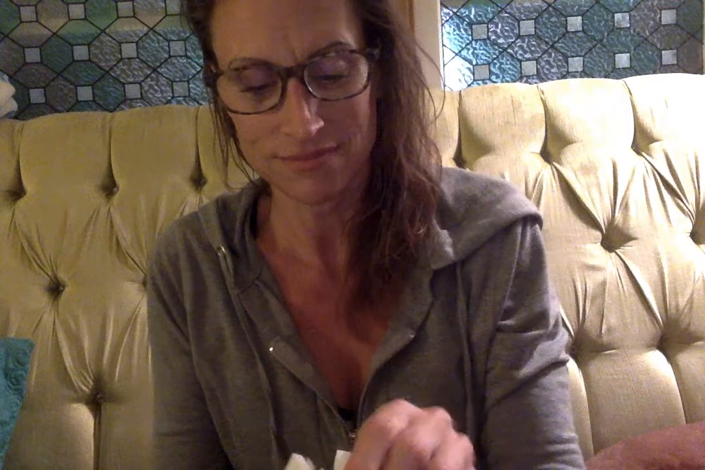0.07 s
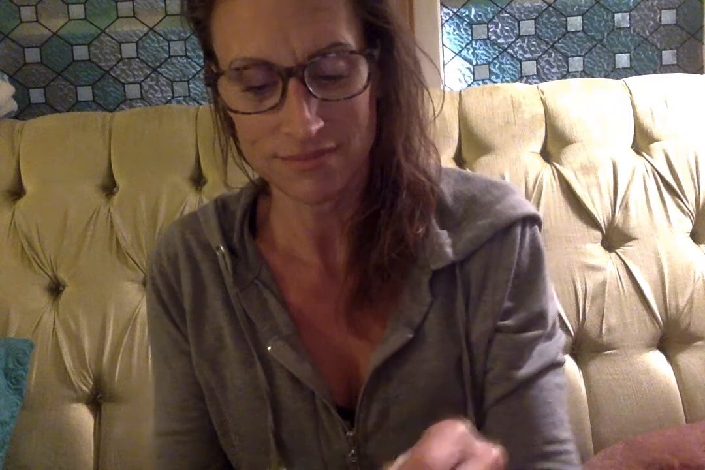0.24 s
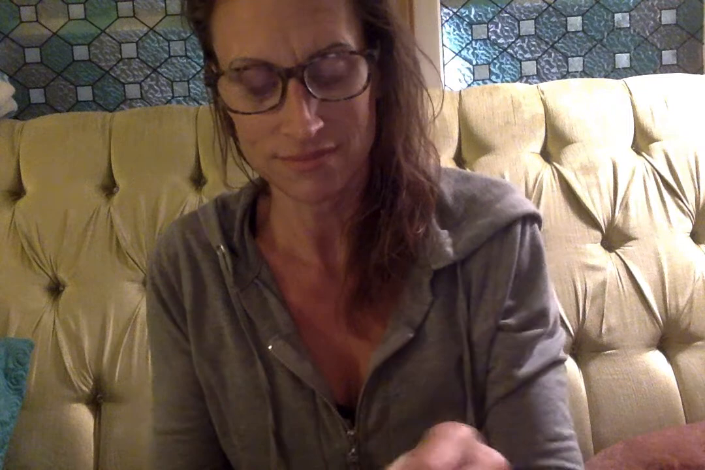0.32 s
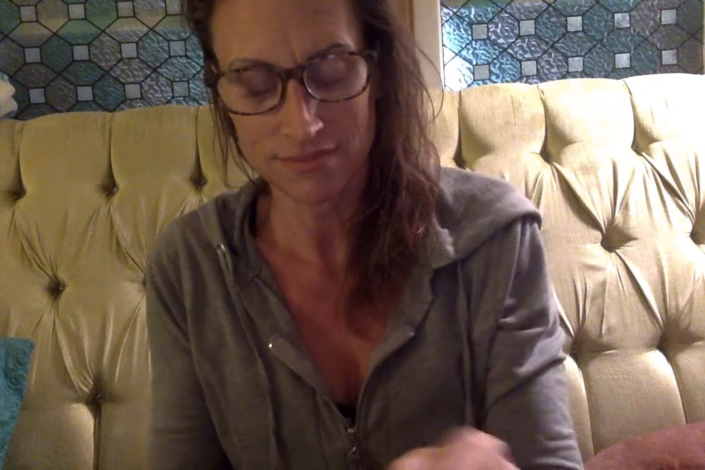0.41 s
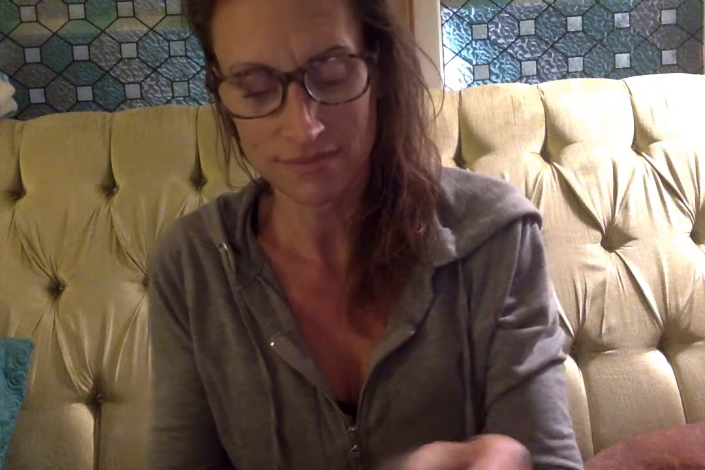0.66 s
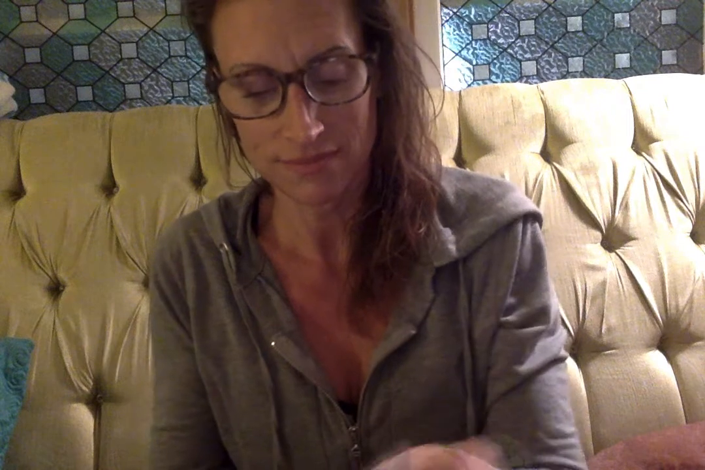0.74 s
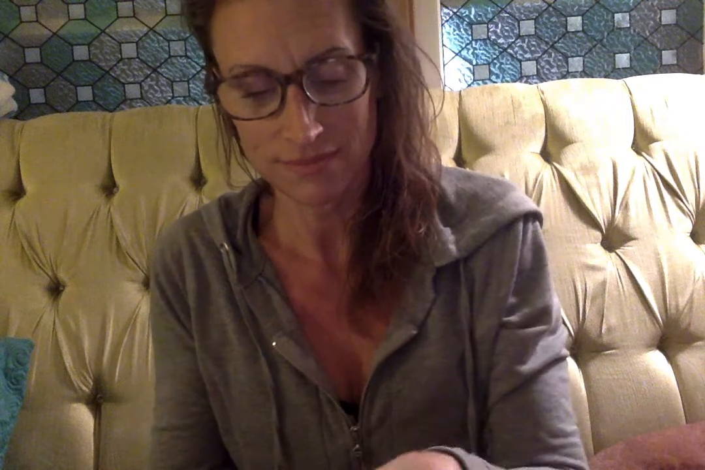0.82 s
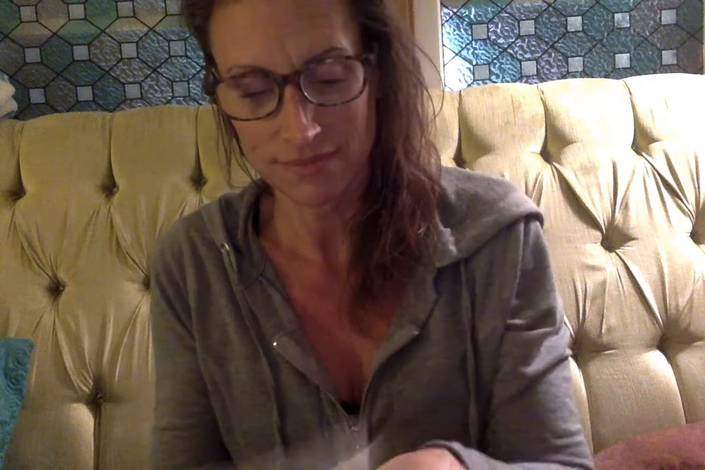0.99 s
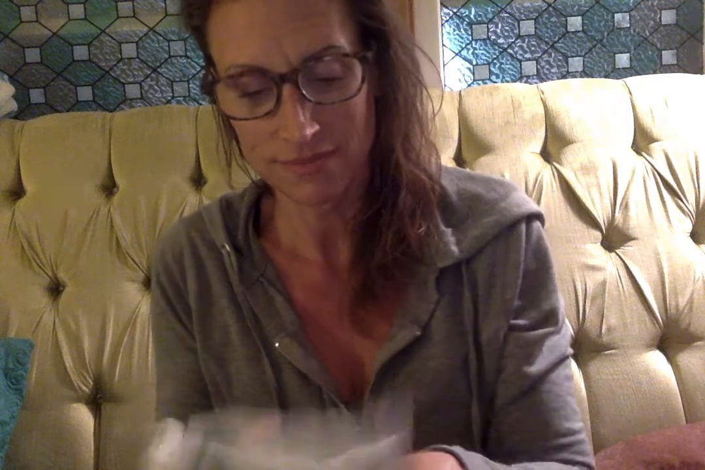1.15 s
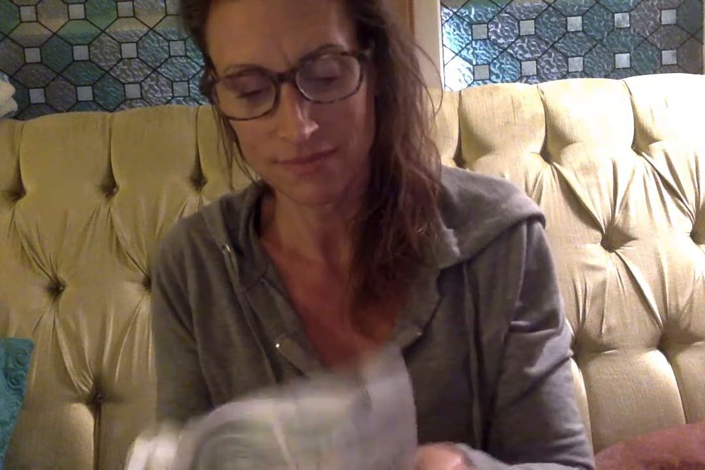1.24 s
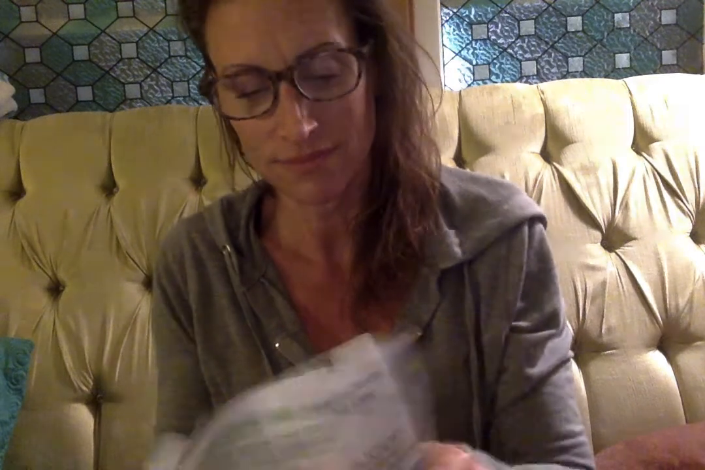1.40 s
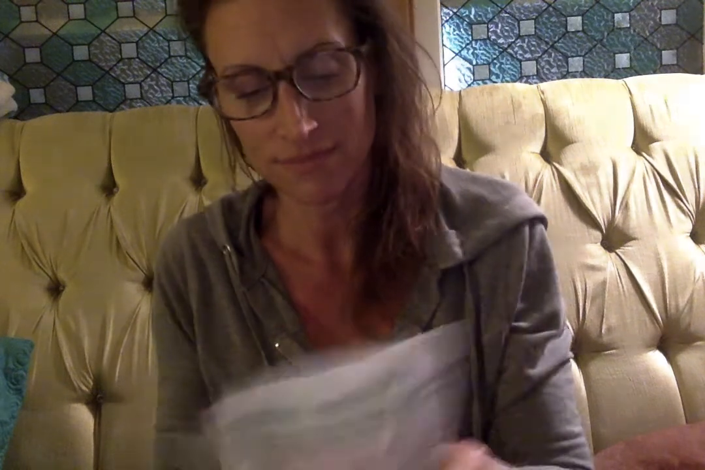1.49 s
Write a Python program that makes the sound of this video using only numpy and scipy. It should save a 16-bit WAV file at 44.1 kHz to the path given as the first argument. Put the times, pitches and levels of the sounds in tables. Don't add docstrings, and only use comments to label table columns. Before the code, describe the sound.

Paper being unfolded, close and dry. Near quiet at first, with faint room hiss and low fan hum. At 0.22 seconds a loud, bright burst of crease snaps, rubbing and dull knocks breaks out, thinning to stray ticks by 0.42. A quiet gap follows, then a small grip crackle and crisp snap around 0.73-0.79. From 1.15 to 1.45 the sheet slides open with softer crinkling and scattered snaps, then quiet.

```python
import sys
import numpy as np
from scipy import signal
from scipy.fft import rfft, irfft
from scipy.io import wavfile

SR = 44100
rng = np.random.default_rng(int(sys.argv[2]) if len(sys.argv) > 2 else 0)


def inscribe(sig):
    pcm = np.round(np.clip(np.atleast_2d(sig).T, -1, 1) * 32767)
    wavfile.write(sys.argv[1], SR, pcm.astype(np.int16))


def voltage_ratio(decibels):
    exponent = np.asarray(decibels, float) / 20
    return 10 ** exponent


N = 68355
BODY_LOW_HZ, BODY_HIGH_HZ, EDGE_TOP_HZ = 1600, 6740, 16000


def rms_one(x):
    return x / np.sqrt(np.mean(x ** 2) + 1e-20)


def band(x, low_hz, high_hz):
    sos = signal.butter(2, [low_hz, min(high_hz, 0.45 * SR)], "band", fs=SR, output="sos")
    return signal.sosfilt(sos, x)


def steep(x, low_hz, high_hz):
    return band(band(x, low_hz, high_hz), low_hz, high_hz)


def resonate(x, hz, width_hz):
    r = np.exp(-np.pi * width_hz / SR)
    zeros = np.array([1, 0, -1]) * (1 - r * r) / 2
    poles = [1, -2 * r * np.cos(2 * np.pi * hz / SR), r * r]
    return signal.lfilter(zeros, poles, x + 1e-18)


def colour(x, points):
    hz, db = np.transpose(points)
    size = 4096
    grid_hz = np.maximum(np.arange(size // 2 + 1) * SR / size, 1)
    log_gain = np.interp(np.log(grid_hz), np.log(hz), db) * np.log(10) / 20
    cepstrum = irfft(log_gain)
    cepstrum[1:size // 2] *= 2
    cepstrum[size // 2 + 1:] = 0
    impulse = irfft(np.exp(rfft(cepstrum)))
    return signal.fftconvolve(x, impulse)[:len(x)]


def drift(rate_hz):
    r = np.exp(-2 * np.pi * rate_hz / SR)
    return rms_one(signal.lfilter([1], [1, -2 * r, r * r], rng.standard_normal(N + SR))[SR:])


def add(out, start_s, burst, peak_db):
    i = int(start_s * SR)
    out[i:i + len(burst)] += voltage_ratio(peak_db) * burst / np.abs(burst).max()


# pitch_hz [Hz], density_db [dB per Hz]
HISS_SPECTRUM = [(130, -2.5), (500, -4.5), (850, -3.5), (1400, -9.5), (2500, -9.5), (6000, -21.5),
                 (14500, -41), (16500, -42)]
# pitch_hz [Hz], width_hz [Hz], level_db [dB]
FAN_TONES = [(107.3, 7.4, -71), (119.4, 11, -76.5), (193.4, 4.7, -82.5), (234.6, 3.5, -81.5),
             (328.3, 26, -79)]


def background():
    low_end = [(30, -42.5), (75, -10.0)]
    hiss = colour(rng.standard_normal(N + SR), low_end + list(HISS_SPECTRUM))[SR:]
    out = voltage_ratio(-68) * rms_one(hiss)
    for pitch_hz, width_hz, level_db in FAN_TONES:
        tone = resonate(rng.standard_normal(N + SR), pitch_hz, width_hz)
        tone = resonate(tone, pitch_hz, 2 * width_hz)
        out += voltage_ratio(level_db) * rms_one(tone[SR:])
    return out


# centre_hz [Hz], t60_s [s], level_db [dB]
ROOM_DECAY = [(500, 0.24, 3.5), (1600, 0.23, 3), (2900, 0.13, -6), (4300, 0.36, -5.5), (6300, .3, -4.5),
              (9000, 0.45, -11), (14000, 0.19, -0.1)]


def room(x):
    desk_ms, desk_db = 1.2, -16.5
    tail_db, tail_rise_s = -12.5, 0.0014
    t = np.arange(SR // 2) / SR
    centres_hz = np.array(ROOM_DECAY)[:, 0]
    edges_hz = np.r_[120, np.sqrt(centres_hz[1:] * centres_hz[:-1]), EDGE_TOP_HZ]
    tail = np.zeros(len(t))
    for (_, t60_s, level_db), low_hz, high_hz in zip(ROOM_DECAY, edges_hz, edges_hz[1:]):
        tail += voltage_ratio(level_db - 60 * t / t60_s) * band(rng.standard_normal(len(t)), low_hz, high_hz)
    tail *= 1 - np.exp(-t / tail_rise_s)
    tail /= np.sqrt(np.sum(tail ** 2))
    echo = np.interp(np.arange(N) - desk_ms * SR / 1000, np.arange(N), x)
    return x + voltage_ratio(desk_db) * echo + voltage_ratio(tail_db) * signal.fftconvolve(x, tail)[:N]


# start_s [s], peak_db [dB], pitch_hz [Hz]
KNOCK_EVENTS = [(.0085, -36, 790), (.009, -51, 1500), (0.221, -41, 280), (0.22, -25, 930), (.235, -21, 966),
                (0.241, -47.5, 99), (0.245, -29.5, 400), (0.258, -26.5, 960), (0.303, -37.5, 322),
                (.31, -44, 475), (.326, -32.5, 940), (.357, -31, 1330), (.42, -47, 1310), (1.205, -55, 338),
                (1.304, -30, 1600), (1.3856, -29.5, 1450), (.0088, -49.5, 500), (.7275, -31.5, 2280),
                (1.4288, -37.5, 4300), (1.024, -63.5, 830)]


def knocks():
    ring_cycles, gain_db = 8.0, 0.3
    out, t = np.zeros(N + SR), np.arange(4096) / SR
    for start_s, peak_db, pitch_hz in KNOCK_EVENTS:
        decay = voltage_ratio(-60 * t * (pitch_hz + 150) / ring_cycles)
        puff = rng.standard_normal(len(t)) * decay
        knock = resonate(resonate(puff, pitch_hz, pitch_hz), pitch_hz, pitch_hz)
        add(out, start_s, knock, peak_db + gain_db)
    return out[:N]


# start_s [s], end_s [s], pitch_hz [Hz], width_hz [Hz], level_db [dB]
SKIM_EVENTS = [
    (0.72, .787, 15200, 1400, -65.5),
    (1.358, 1.43, 20000, 1600, -74.5),
    (.74, .768, 4550, 2800, -56),
    (1.155, 1.4, 4000, 1000, -61.5),
    (1.185, 1.26, 2320, 670, -61),
    (.235, .3, 2950, 510, -38),
    (0.24, .42, 3300, 1050, -55),
    (1.216, 1.2, 10500, 3000, -64),
]


def skims():
    t = np.arange(N) / SR
    out = np.zeros(N)
    for start_s, end_s, pitch_hz, width_hz, level_db in SKIM_EVENTS:
        gate = np.interp(t, [start_s, start_s + 0.0034, end_s - 0.005, end_s], [0, 1, 1, 0])
        rub = steep(rng.standard_normal(N), pitch_hz - width_hz / 2, pitch_hz + width_hz / 2)
        out += voltage_ratio(level_db + 1.0 * drift(90.0)) * gate * rms_one(rub)
    return out


# time_s [s], level_db [dB], bright_db [dB]
SLIDE_EFFORT = [(0, -79, -16), (0.217, -67, -21), (0.227, -34.5, -2), (.3, -40, -4), (.4, -54.5, -31),
                (.5, -76.5, -15), (0.721, -79, -12), (.735, -71.5, -21), (0.777, -57, -21), (.83, -71, -1),
                (1.145, -89.5, -9), (1.159, -67.5, -10), (1.215, -53, -17.5), (1.27, -49, -29),
                (1.37, -57, -29), (1.421, -53.5, -8), (1.47, -61, -29), (1.55, -96.5, -0.5)]


def crinkle():
    grains_per_s, spread_db, ring_cycles = 14000, 2.5, 14.0
    low_hz, high_hz, tilt_db_per_octave, clump_db = 1766, 15000, -2, 3
    panel_hz, panel_width_hz, panel_db = 2900, 410, -4.5
    sizes = voltage_ratio(spread_db * np.minimum(rng.exponential(1, N), 4)) * rng.choice([-1, 1], N)
    grains = sizes * (rng.random(N) < grains_per_s / SR)
    dealt = rng.integers(0, 18, N)
    rings = []
    for k, pitch_hz in enumerate(np.geomspace(low_hz, high_hz, 18)):
        ring = rms_one(resonate(grains * (dealt == k), pitch_hz, 2 * pitch_hz / ring_cycles))
        level_db = tilt_db_per_octave * np.log2(pitch_hz / low_hz) + clump_db * drift(23.0)
        rings.append(voltage_ratio(level_db) * ring)
    body = steep(sum(rings[:11]), BODY_LOW_HZ, BODY_HIGH_HZ)
    body = rms_one(body + voltage_ratio(panel_db) * resonate(body, panel_hz, panel_width_hz))
    edge = rms_one(steep(sum(rings[11:]), BODY_HIGH_HZ, EDGE_TOP_HZ))
    time_s, level_db, bright_db = np.transpose(SLIDE_EFFORT)
    t = np.arange(N) / SR
    effort = voltage_ratio(np.interp(t, time_s, level_db) + 3.65 * drift(27.0))
    return effort * (body + voltage_ratio(np.interp(t, time_s, bright_db)) * edge)


# start_s [s], peak_db [dB],
# pitch_hz [Hz], bright_db [dB], length_ms [ms]
CREASE_SNAPS = [(.2206, -5.5, 3500, -4.5, 0.96), (0.2215, -3.5, 4300, -2.5, 1.6),
                (0.2232, -4.5, 4600, -2, 0.91), (0.2244, -9, 3000, -7, 0.63), (0.2311, -4.5, 4140, -6, .9),
                (0.2376, -6.5, 3980, -2, 0.36), (.2398, -12.5, 2730, -23.5, 0.55),
                (.2483, -7, 4310, -15, 0.49), (0.2622, -26, 2980, -16, 0.53), (.305, -13, 5930, -17, 0.95),
                (0.3111, -25.5, 2500, -6, 3.1), (0.3253, -14, 3240, -1.5, 2.6),
                (.358, -22.5, 2630, -15, 0.75), (0.3711, -31, 3370, -21, 0.67),
                (0.421, -20.5, 4065, -4, 1.42),
                (.089, -56, 12200, 11, 1.3), (0.1217, -42, 2650, -57, 1.6), (.149, -59, 9000, -2.5, 1.2),
              (.5192, -44, 5800, -25, 0.56), (0.6534, -46.5, 2100, -28.5, 0.81), (.662, -59, 4950, 1, 0.61),
              (.7272, -28.5, 3605, -26.5, 1.03), (0.7338, -39, 4060, -27, 0.63),
              (0.7429, -43.5, 2900, -38.5, 1.6), (0.7535, -38, 4400, -25.5, 1.7),
              (0.759, -39, 4750, -22, 3.1), (0.778, -38, 2673, -28.5, 0.65), (.7878, -18, 3610, -6, 1.8),
                (1.1547, -39, 3930, -0.5, 5.2), (1.164, -43.5, 3880, -21.5, 1.8),
              (1.2179, -30, 2600, -10.5, 5.1), (1.2367, -40, 2230, -46, 3.5), (1.2494, -29, 2180, -32, 3.3),
              (1.2664, -35, 2520, -28, 1.4), (1.2957, -26, 2500, -30, 1.6),
              (1.3001, -21.5, 3880, -19.5, .8), (1.3026, -30.5, 3160, -24, 1.8),
              (1.3279, -37, 2380, -52, 1.7), (1.355, -24, 3760, -5.5, 1.25), (1.3682, -41, 2270, -37, 1.6),
              (1.3871, -25, 3180, -15.5, 0.32), (1.3969, -17, 4070, -17, 1.1),
              (1.4026, -25, 4000, -18, 1.25), (1.4068, -21.5, 4930, -9.5, 1.2),
              (1.4285, -23.5, 2376, -21.5, 2.06), (1.4387, -38, 2000, -36, 1.5)]


def snaps():
    ring_width, body_db, gain_db = 0.67, 7, 2.18
    rise_ms, crack_ms, crack_db = 0.11, 0.3, 12.0
    body_follows, dull_rise, dull_narrow = 0.6, 0.5, 0.21
    sheet_floor_hz = 1500
    out, ms = np.zeros(N + SR), np.arange(1024) / SR * 1000
    for start_s, peak_db, pitch_hz, bright_db, length_ms in CREASE_SNAPS:
        crack = voltage_ratio(crack_db + body_follows * bright_db) * np.exp(-ms / crack_ms)
        shape = np.exp(-ms / max(length_ms, 0.1)) + crack
        rise = 1 - np.exp(-ms / (rise_ms * voltage_ratio(-dull_rise * bright_db)))
        spray = rng.standard_normal(len(ms)) * rise * shape
        width_hz = ring_width * pitch_hz * voltage_ratio(dull_narrow * bright_db)
        ring = rms_one(resonate(resonate(spray, pitch_hz, width_hz), pitch_hz, width_hz))
        body = rms_one(steep(spray, BODY_LOW_HZ, BODY_HIGH_HZ))
        edge = rms_one(steep(spray, BODY_HIGH_HZ, EDGE_TOP_HZ))
        snap = ring + voltage_ratio(body_db + body_follows * bright_db) * body + voltage_ratio(bright_db) * edge
        add(out, start_s, snap, peak_db + gain_db)
    return signal.sosfilt(signal.butter(4, sheet_floor_hz, "high", fs=SR, output="sos"), out[:N])


# pitch_hz [Hz], gain_db [dB]
MIC_COLOUR = [(400, 1.5), (2000, -3.5), (4300, 0), (5000, -5), (6500, -0.45), (7300, -11.5), (8300, 0),
              (13000, 5.5)]


def scene():
    paper = snaps() + knocks() + crinkle() + skims()
    return (colour(room(paper), MIC_COLOUR) + background())[None]


def low_pass(x):
    return signal.sosfilt(signal.butter(12, 17010, fs=SR, output="sos"), x)


def record(dry):
    limit = 0.62
    mix = limit * np.tanh(dry / limit)
    mix = signal.sosfilt(signal.cheby2(10, 60, 17000, fs=SR, output="sos"), mix)
    mix = signal.sosfilt(signal.butter(2, 80, "high", fs=SR, output="sos"), mix)
    return low_pass(mix)


dry = scene()
out = record(dry)
inscribe(out)
```